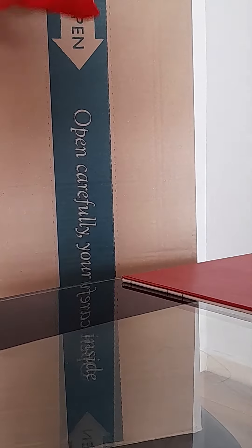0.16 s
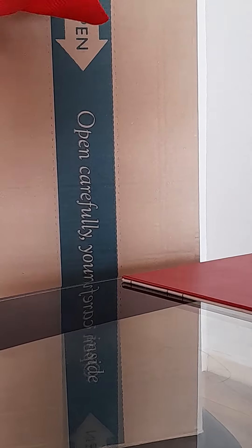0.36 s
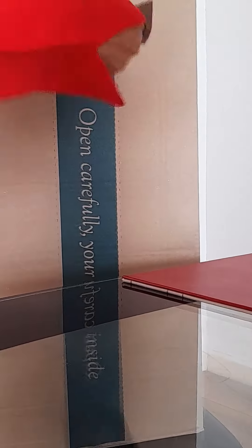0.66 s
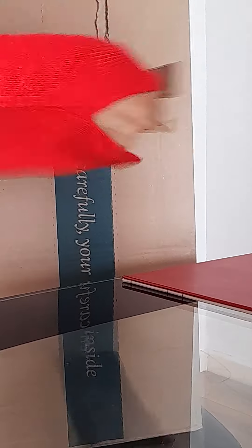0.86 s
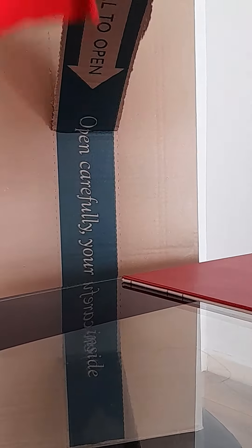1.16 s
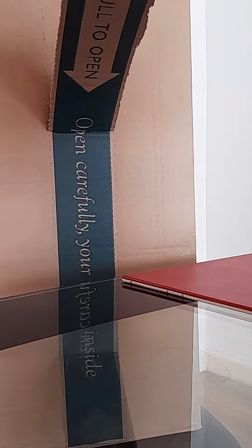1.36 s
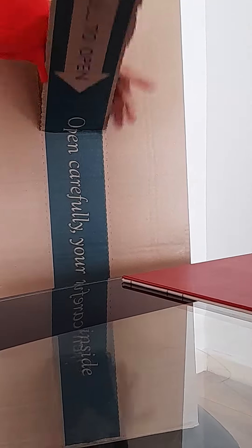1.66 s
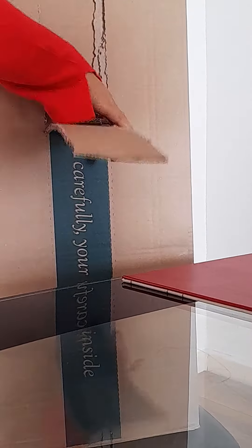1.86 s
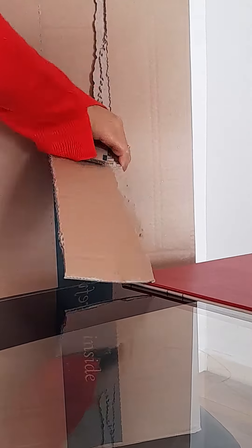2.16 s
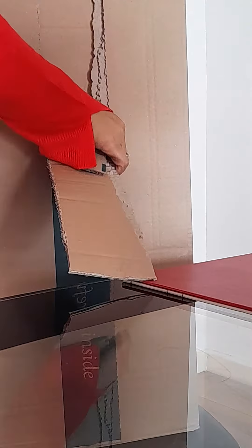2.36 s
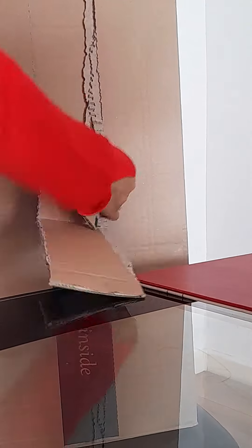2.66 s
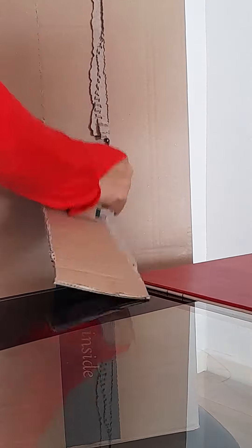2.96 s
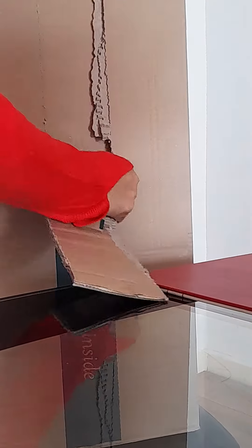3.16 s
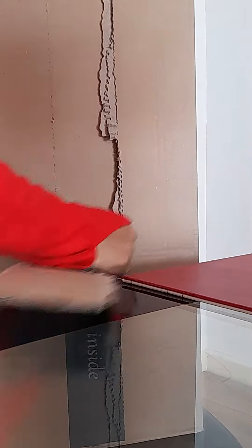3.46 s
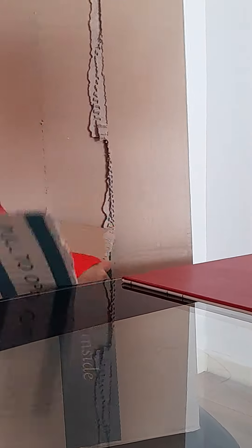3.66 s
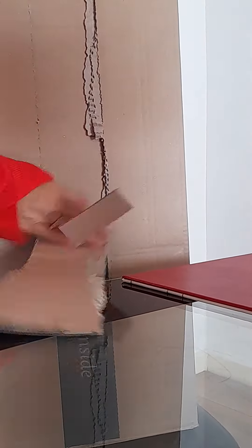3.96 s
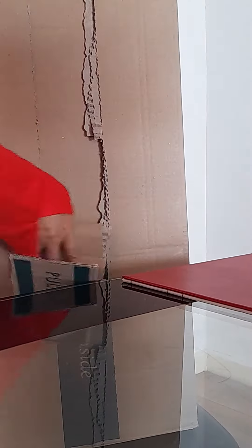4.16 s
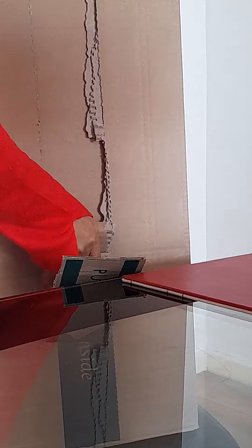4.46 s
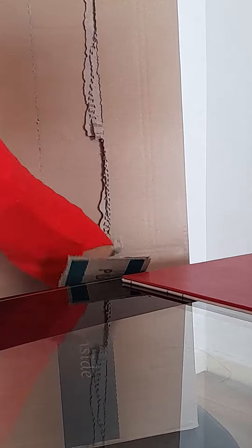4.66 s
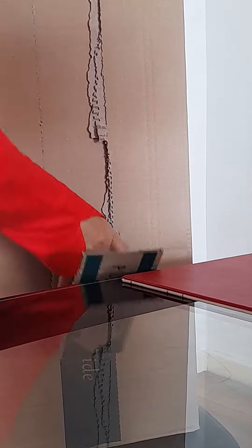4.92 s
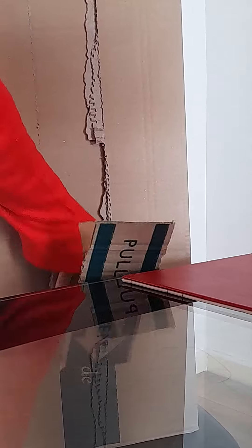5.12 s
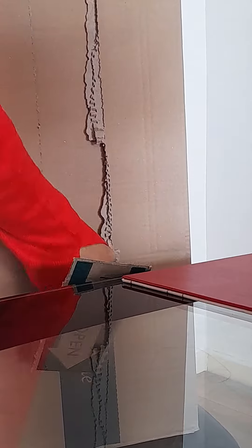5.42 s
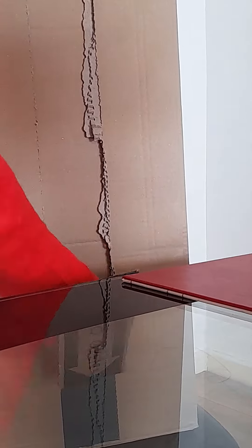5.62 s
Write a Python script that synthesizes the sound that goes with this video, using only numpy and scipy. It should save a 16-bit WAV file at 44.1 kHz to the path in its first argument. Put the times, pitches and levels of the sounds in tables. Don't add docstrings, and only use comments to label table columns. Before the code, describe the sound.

A hand tears the perforated strip out of a big cardboard box. Loud stuttering rips fill the first second, then near quiet with faint rubbing and rustling, followed by shorter rips, sharp snaps and hollow thumps at intervals. Close stereo phone microphone, bare echoing room, slight hiss.

```python
import sys
import numpy as np
from scipy import signal
from scipy.fft import rfft, irfft, next_fast_len
from scipy.io import wavfile

SR = 44100
rng = np.random.default_rng(int(sys.argv[2]) if len(sys.argv) > 2 else 0)


def ratio_of_db(decibels):
    return 10 ** (np.asarray(decibels, float) / 20)


def transcribe(signal):
    frames = np.atleast_2d(signal).T
    limited = np.clip(frames, -1, 1)
    pcm = np.round(limited * 32767).astype(np.int16)
    wavfile.write(sys.argv[1], SR, pcm)


N = 255339

# t/s, level/dB
BRIDGES = [(0.068, 7.5), (0.113, 11), (0.149, 11.5), (0.401, 16.5), (0.421, 10.5), (0.439, 5.5), (0.46, 7),
           (0.533, 0), (0.581, 1.5), (0.605, 6), (0.617, 4.5), (0.632, 8.5), (0.651, 16), (0.675, 11),
           (0.692, 7.5), (0.709, 7), (0.764, 1), (0.787, 15.5), (2.492, 16), (2.517, 0), (2.552, 9),
           (2.589, 5.5), (3.189, 10), (3.217, 8.5), (3.243, 7.5), (3.51, 12.5), (3.559, 8.5), (4.51, 0),
           (4.566, 5.5), (4.588, 4)]
# start t/s, length t/s, force level/dB, panels over force/dB, box air over force/dB
TUGS = [(.06, 0.079, -30, -2.5, -22), (.106, 0.034, -21.5, -2.5, -6.5), (.368, 0.016, -16, 3, -6),
        (.405, 0.076, -24.5, 0.5, -3.5), (.48, 0.1, -33, 5, -22), (.57, 0.064, -23.5, -1, -6),
        (.63, 0.078, -25.5, -3, -1.5), (.69, .07, -21, -1.5, 1.5), (.76, 0.082, -27.5, 2.5, -2),
        (2.49, 0.022, -27.5, -13, -23), (2.539, 0.038, -21.5, -2.5, -12), (2.585, 0.08, -35.5, 0, 2),
        (3.187, 0.027, -23, -4, -3), (3.24, 0.021, -17, 7, 10.5), (3.27, 0.025, -23, 11, 7),
        (3.31, 0.038, -40, 2, 8), (3.49, 0.06, -46.5, 4.5, -4), (4.494, 0.077, -34.5, 10.5, -9),
        (4.565, .04, -27, 10.5, 2), (4.605, 0.024, -22, 8, -2), (4.64, 0.024, -31, 3, -3),
        (5.46, 0.037, -22, 9, -5), (5.49, 0.018, -21, -7, -10), (5.52, 0.026, -33, 4, 14)]
# f/Hz, level/dB
FIBRE_COLOUR = [(410, -24.5), (700, -9.5), (978, 5), (1320, -3), (1610, 1), (2580, 2.5), (2810, 0.5),
                (3570, -7.5), (6340, -6), (8500, -18.5), (11000, -60.5), (18700, -120)]


def tearing():
    bridges = np.zeros(N)
    for start_s, db in BRIDGES:
        bridges[int(start_s * SR)] = ratio_of_db(db)
    stutter = bursts(170, uneven=0.6, scatter_db=3.0)
    gate = 1.59 + 0.24 * decay(stutter, 0.5) + 6.54 * decay(bridges, 0.97)
    sizzle_db = -3.5 - 0.23 * np.arange(N) / SR
    gains = effort(TUGS, attack_s=0.009, release_s=0.0091, sizzle_db=sizzle_db)
    pitches = grip()[1:]
    return card(gains, pitches, FIBRE_COLOUR, gate, spread_db=2.76, thump=6 * decay(bridges, 0.2))


# start t/s, length t/s, force level/dB, panels over force/dB, box air over force/dB
STROKES = [(0, .015, -69, -7, -14), (.045, 0.029, -25.5, -1, -18), (.26, 0.016, -53, 13, 19),
           (.92, 0.062, -56, 26, 27), (1.59, 0.04, -66, -3, 13), (1.77, 0.036, -66, 19, 6),
           (1.99, 0.12, -52.5, 1, -12), (2.12, 0.064, -56, 10.5, 14.5), (2.345, 0.047, -56.5, 20.5, 6),
           (2.44, 0.079, -45, 6, 5.5), (2.64, 0.059, -44.5, 4, 1), (3.0, 0.084, -64, 14, 17),
           (3.14, 0.099, -48, -16, 4), (3.345, 0.051, -36.5, -10, 4), (3.395, 0.11, -35.5, 0.5, -7),
           (3.56, 0.08, -53, -7, 17), (3.72, 0.15, -63, -1, 19), (3.955, 0.07, -46.5, 11, 13.5),
           (4.04, 0.12, -50, 8, 12.5), (4.4, 0.107, -48.5, 4.5, -3), (4.93, 0.1, -67.5, 8, 18),
           (5.12, 0.17, -53.5, 9, 8.5), (5.38, 0.21, -45, -2.5, -12), (5.6, 0.036, -62, 10, 22)]
# start t/s, length t/s, level/dB
WHISKS = [(1.117, .03, -66.5), (1.328, .03, -63), (1.674, .07, -55), (2.03, 0.056, -57.5),
          (2.375, 0.025, -51), (2.778, 0.022, -52), (3.095, 0.02, -47.5), (1.93, .05, -59),
          (3.88, 0.017, -42.5), (4.03, 0.046, -49), (4.856, 0.087, -64), (5.217, 0.038, -64),
          (5.348, 0.11, -58)]
# f/Hz, level/dB
RUB_COLOUR = [(410, -26), (700, -24), (1040, 5), (1270, -2), (1500, -1.5), (1990, 1.5), (3250, -7),
              (6020, -4.5), (8500, -12), (11000, -79), (18700, -120)]
GRIP_LAYERS_DB = (0, -4.5, 5, -4.5)


def handling():
    attack_s, release_s = 0.01, 0.013
    slips = bursts(45, uneven=0.5, scatter_db=2.5)
    pressure_db, *pitches = grip()
    stroking = effort(STROKES, attack_s, release_s, sizzle_db=-2)
    resting = ratio_of_db(pressure_db + np.array(GRIP_LAYERS_DB)[:, None])
    gains = np.hypot(stroking, resting)
    for start_s, length_s, db in WHISKS:
        gains[1] += ratio_of_db(db) * envelope(start_s, length_s, attack_s, release_s)
    gate = 0.41 + 1.2 * decay(slips, 17.0)
    return card(gains, pitches, RUB_COLOUR, gate, spread_db=0.51, thump=3 * decay(slips, 0.31))


# f/Hz, level/dB
SIZZLE_COLOUR = [(4880, -25.5), (8300, -8.5), (12300, -1), (15300, -5.5), (15900, -14.5), (16300, -37.5)]
# f/Hz, width f/Hz, level/dB
PANELS = [(235, 36, -9), (300, 21, -8.5), (362.8, 35.7, -7), (423.3, 46, -3), (500, 120, -5), (650, 68, -3),
          (742, 100, -4.5), (1000, 380, -17)]
# f/Hz, width f/Hz, level/dB
AIR = [(53.8, 26, -4), (74, 25, 2), (112.6, 17, -2.5), (132, 30, -4), (155, 21.8, 0)]


def card(gains, pitches, spectrum, gate, spread_db, thump):
    drive = crackle(spread_db) * gate
    push = rng.standard_normal(N) * gate + thump
    fibres = 0
    for gain, points in zip(gains, (spectrum, SIZZLE_COLOUR)):
        fibres = fibres + colour(drive * gain, points) / np.std(colour(drive, points))
    panels = drum(push, PANELS, gains[2], pitches[0], reach=0.38)
    box_air = drum(push, AIR, gains[3], pitches[1], reach=0.21)
    return fibres + panels + box_air


def drum(push, modes, gain, grip_hz, reach):
    share = np.array([np.exp(-(np.log2(grip_hz / m[0]) / reach) ** 2) + 0.39 for m in modes])
    share *= gain / np.sqrt(np.mean(share ** 2, axis=0)) / np.std(ring(push, modes))
    return sum((-1) ** k * ring(push * share[k], [m]) for k, m in enumerate(modes))


# t/s, pressure level/dB, favoured panel f/Hz, favoured air f/Hz
GRIP = [(0, -43.5, 254, 165), (0.459, -49.5, 279, 170), (.72, -50, 256, 106), (1.0, -53.5, 330, 98.5),
        (1.2, -80.5, 299, 104), (1.551, -91, 300, 140.6), (1.62, -59, 260, 121), (1.9, -58.5, 300, 173),
        (2.3, -63, 326, 132), (2.38, -62, 520, 138), (2.55, -68, 303, 110), (2.899, -58, 273, 180),
        (3.25, -52.5, 264, 117), (3.6, -54, 355, 155), (4.2, -52, 314, 155), (4.55, -54.5, 273, 115.3),
        (5.1, -58, 300, 134.4), (5.79, -54.5, 273, 128)]


def grip():
    s, *columns = np.transpose(GRIP)
    return [np.interp(np.arange(N) / SR, s, c) for c in columns]


def effort(moves, attack_s, release_s, sizzle_db):
    power = np.zeros((3, N))
    for start_s, length_s, db, panels_db, air_db in moves:
        levels = ratio_of_db(db + np.array([[0], [panels_db], [air_db]]))
        power += (levels * envelope(start_s, length_s, attack_s, release_s)) ** 2
    force, panels, air = np.sqrt(power)
    return np.array([force, force * ratio_of_db(sizzle_db), panels, air])


def envelope(start_s, length_s, attack_s, release_s):
    t = np.arange(N) / SR - start_s
    return np.clip(t / attack_s, 0, 1) * np.exp(-np.clip(t - length_s, 0, None) / release_s)


def bursts(rate_hz, uneven, scatter_db):
    chance = rng.standard_normal((1500, 2)).T
    at = np.cumsum(SR / rate_hz * np.exp(uneven * chance[0])).astype(int)
    out = np.zeros(N)
    out[at[at < N]] = ratio_of_db(scatter_db * chance[1])[at < N]
    return out


def crackle(spread_db):
    return unit(rng.standard_normal(N) * ratio_of_db(spread_db * rng.exponential(size=N)))


def unit(x):
    return x / np.sqrt(np.mean(x ** 2))


def decay(x, ms):
    return signal.lfilter([1], [1, -np.exp(-1000 / (ms * SR))], x)


def ring(x, modes):
    out = 0
    for k, (hz, width, db) in enumerate(modes):
        out = out + (-1) ** k * ratio_of_db(db) * signal.lfilter(*signal.iirpeak(hz, hz / width, SR), x)
    return out


def colour(x, points):
    hz, db = np.transpose(points)
    log_hz = np.log(np.fft.rfftfreq(2048, 1 / SR) + 1)
    cepstrum = irfft(np.interp(log_hz, np.log(hz), db) * np.log(10) / 20)
    cepstrum[1:1024] *= 2
    cepstrum[1025:] = 0
    return signal.fftconvolve(x, irfft(np.exp(rfft(cepstrum))))[:len(x)]


# t/s, peak level/dB, f/Hz, click level/dB
KNOCKS = [(0.111, -6.5, 258, -12), (0.368, -8, 322, -1.5), (0.969, -22, 304, -34), (1.587, -46.5, 332, -26),
          (1.769, -34, 240, -29), (1.804, -34, 463, -17), (2.041, -33, 300, -30), (2.351, -39, 480, -9),
          (2.452, -34, 330, -4), (2.541, -9, 535, 0.5), (2.992, -41, 220, -6), (3.042, -29.5, 334, -15),
          (3.187, -10, 333, -10), (3.22, -9.5, 201, -31), (3.723, -21.5, 342, -14.5),
          (3.844, -31, 350, -10), (3.963, -23.5, 245, -27), (0.148, -7.5, 300, -15),
          (4.095, -25.5, 304, -9), (4.301, -30, 250, -12), (4.383, -38, 242, -27), (4.495, -11.5, 329, -7),
          (4.565, -5.5, 290, -8.5), (4.603, -15, 305, -1), (4.931, -35, 273, -26), (4.968, -33.5, 226, -13),
          (5.252, -25.5, 155, -13), (5.443, -25.5, 300, -16), (5.458, -18, 424, -3), (5.484, -9, 305, -23)]


def knocks():
    out, t = np.zeros(N + 4000), np.arange(4000) / SR
    dull = [(885, 1500, 7.4)]
    for start_s, db, hz, click_db in KNOCKS:
        tone = np.sin(2 * np.pi * hz * t) * np.exp(-t / 0.0095)
        if hz < 450:
            tone += 0.44 * np.sin(2 * np.pi * 2.24 * hz * t) * np.exp(-t / 0.0041)
        tap = rng.standard_normal(len(t)) * np.exp(-t / 0.0038)
        click = ratio_of_db(click_db) * ring(ring(tap, dull), dull)
        i = int(start_s * SR)
        out[i:i + len(t)] += ratio_of_db(db) * (tone * np.clip(t / 0.002, 0, 1) + click)
    return 0.6 * out[:N]


# t/s, peak level/dB, centre f/Hz
SNAPS = [(2.219, -61, 942), (2.372, -38, 9000), (2.389, -31, 939), (2.458, -33, 700), (2.468, -35, 1950),
         (2.545, -4.5, 1600), (3.4930, -9.5, 1036), (3.782, -36, 1990), (3.952, -33, 1010),
         (4.169, -35.5, 2350), (5.364, -21, 10400), (5.377, -35, 10000), (5.464, -34, 2180)]


def snaps():
    out, t = np.zeros(N + 600), np.arange(600) / SR
    for start_s, db, hz in SNAPS:
        jolt = (t == 0) + 0.12 * rng.standard_normal(len(t)) * np.exp(-t / 0.001)
        crack = ring(ring(jolt, [(hz, hz / 1.4, 0)]), [(hz, 2 * hz, 0)]) + 0.03 * jolt
        i = int(start_s * SR)
        out[i:i + len(t)] += ratio_of_db(db) * crack / np.max(np.abs(crack))
    return out[:N]


PORT_LAGS = [23, 15, 24, 10]


def room(x):
    wet_db, stay_s = 3, 0.05
    t, out = np.arange(32768) / SR, 0
    place = np.arange(N) / SR / stay_s % 4

    def fade(t60, db):
        return ratio_of_db(db - 60 * t / t60) * np.clip(t / 0.012, 0, 1) / np.sqrt(t60)

    for k, lag in enumerate(PORT_LAGS):
        paths = stereo_bands(len(t), fade)
        paths *= ratio_of_db(wet_db) / np.sqrt(np.sum(paths ** 2) / 2)
        paths[[0, 1], [0, lag]] += 1
        near = np.cos(np.pi / 2 * np.clip(np.abs((place - k + 2) % 4 - 2), 0, 1))
        out = out + signal.oaconvolve((x * near)[None], paths, axes=1)[:, :N]
    return out


# f/Hz, decay t60/s, left-right likeness (0-1), echo level/dB
ROOM = [(60, 0.53, 0.91, 0), (250, 0.37, 1, 1), (600, 0.43, 0.73, -3), (1380, 0.47, .05, -3),
        (3700, 0.38, 0.026, 4), (7950, 0.3, .02, 2.5), (16000, 0.19, .02, -2.5)]


def stereo_bands(size, fade):
    out, hz = np.zeros((2, size)), np.fft.rfftfreq(size, 1 / SR)
    table, noise = np.transpose(ROOM), rfft(rng.standard_normal((2, size)))
    for centre in 22 * 2 ** np.arange(0, 10, 0.5):
        t60, alike, echo_db = (np.interp(np.log(centre), np.log(table[0]), c) for c in table[1:])
        window = np.cos(np.pi * np.clip(np.log2((hz + 1) / centre), -0.5, 0.5))
        mid, side = irfft(noise * window ** 2, size)
        alike = np.clip(alike, 0, 1)
        stereo = np.sqrt(1 + alike) * mid + np.sqrt(1 - alike) * side * np.array([[1], [-1]])
        out += stereo * fade(t60, echo_db)
    return out


# f/Hz, level/dB
HUSH_COLOUR = [(18, -58), (30, -21.5), (194, -16), (295, -5), (355, -17), (866, -13.5), (1460, -26.5),
               (5740, -18.5), (16000, -27.5)]


def hush():
    bands = stereo_bands(next_fast_len(N + 1, True), lambda t60, db: 1)[:, :N]
    return ratio_of_db(-70) * unit(np.array([colour(x, HUSH_COLOUR) for x in bands]))


def scene():
    hand = ratio_of_db(-4.5) * (tearing() + handling())
    return room(hand + knocks() + snaps()) + hush()


def roll_off(x):
    return signal.sosfilt(signal.butter(12, 16870, fs=SR, output="sos"), x)


# f/Hz, left minus right level/dB
BALANCE = [(60, -2.5), (110, -0.5), (200, -2), (380, -3.5), (700, -5), (1290, -6.5), (2380, -4.5),
           (4400, -5), (8120, -2.5), (15000, -1)]


def record(dry):
    ports = []
    for x, side in zip(dry, (1, -1)):
        ports.append(colour(x, [(hz + 1, side * db / 2) for hz, db in BALANCE]))
    low_cut = signal.butter(3, 38, "high", fs=SR, output="sos")
    top_cut = signal.ellip(10, 0.3, 70, 15950, fs=SR, output="sos")
    mix = signal.sosfilt(low_cut, np.array(ports))
    mix = 0.9 * np.tanh(mix / 0.9)
    mix = signal.sosfilt(top_cut, mix)
    return roll_off(mix)


dry = scene()
out = record(dry)
transcribe(out)
```